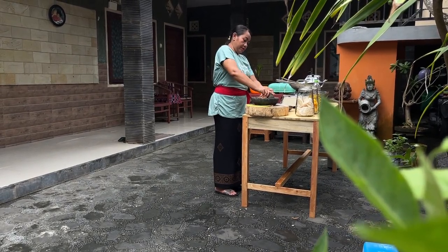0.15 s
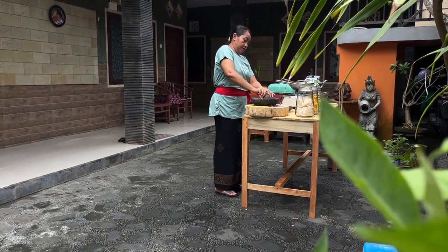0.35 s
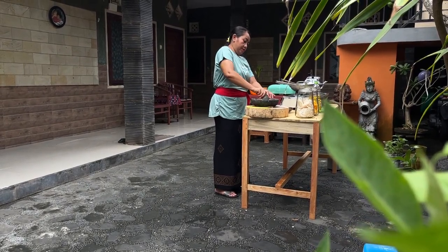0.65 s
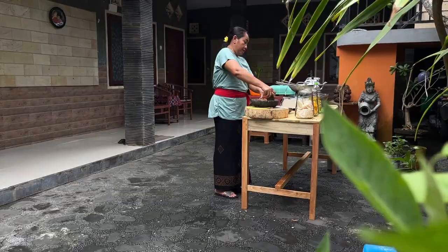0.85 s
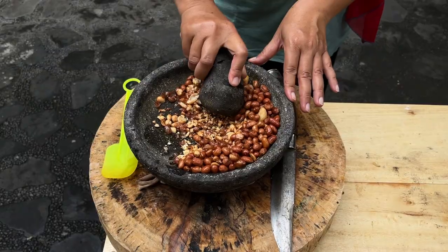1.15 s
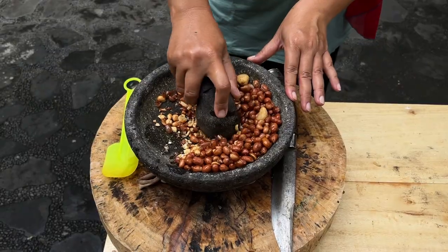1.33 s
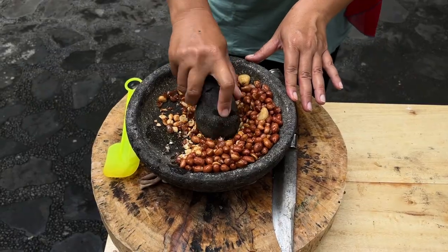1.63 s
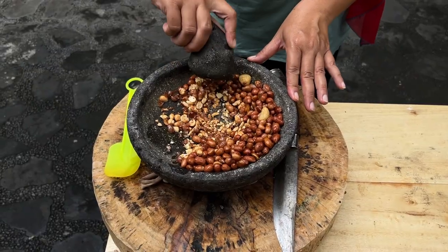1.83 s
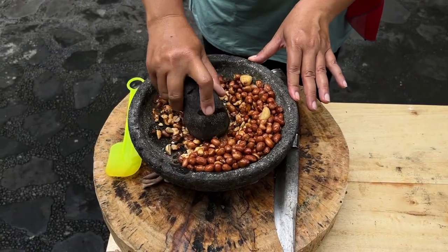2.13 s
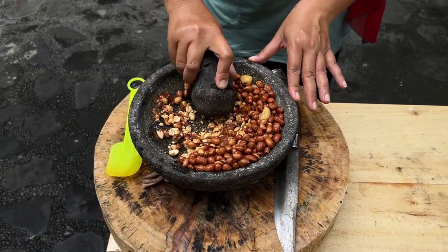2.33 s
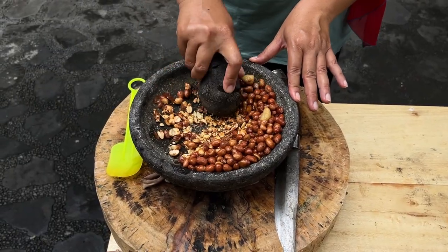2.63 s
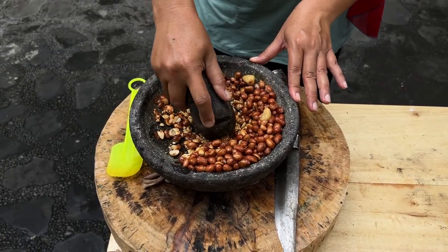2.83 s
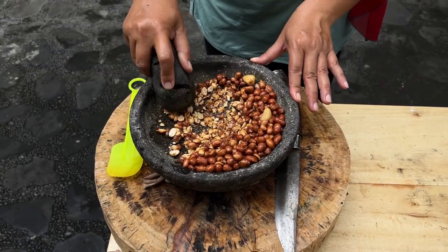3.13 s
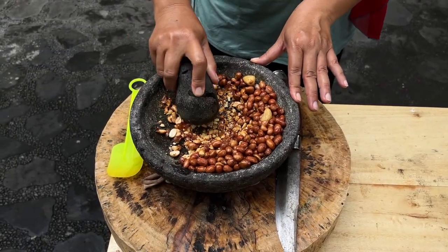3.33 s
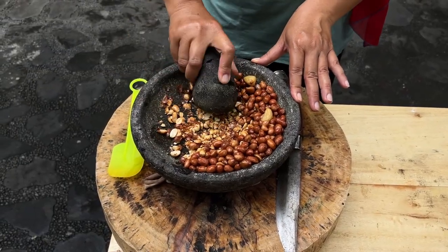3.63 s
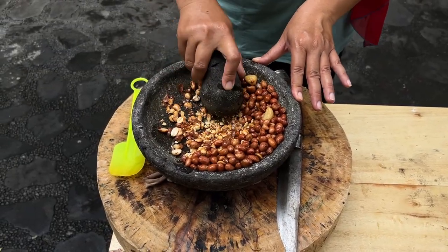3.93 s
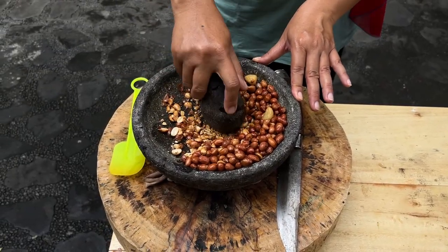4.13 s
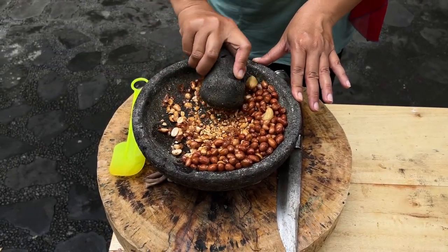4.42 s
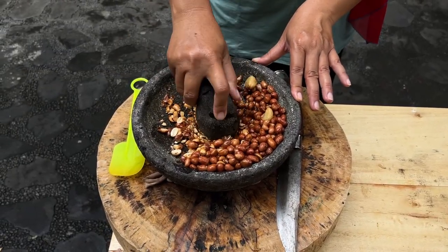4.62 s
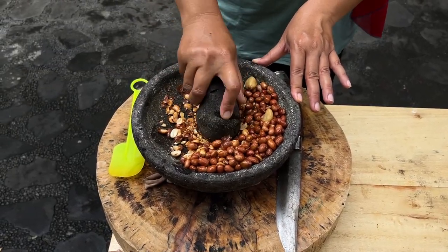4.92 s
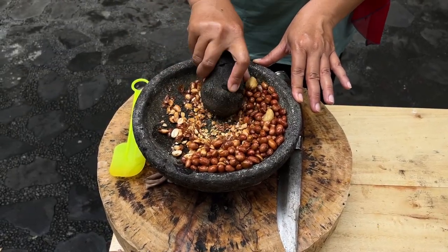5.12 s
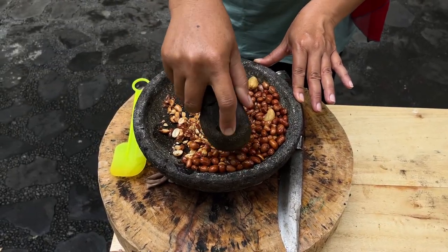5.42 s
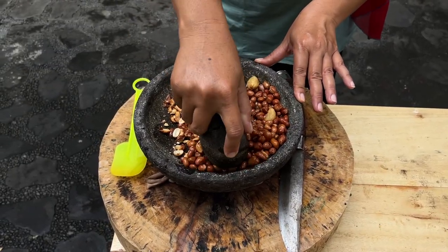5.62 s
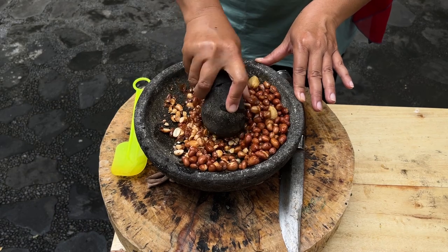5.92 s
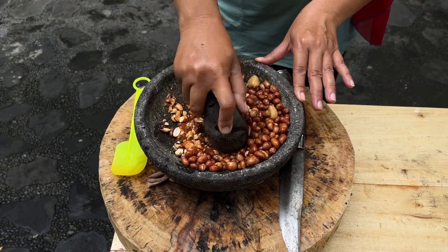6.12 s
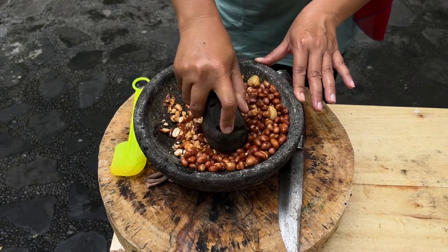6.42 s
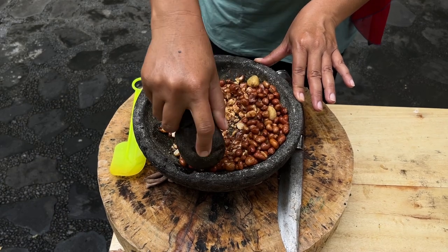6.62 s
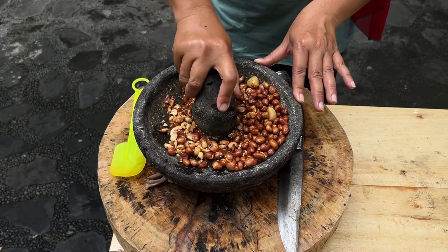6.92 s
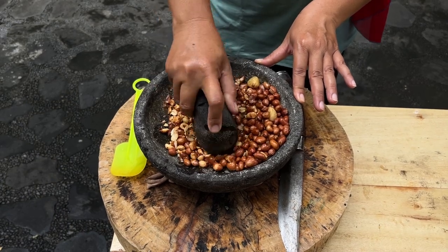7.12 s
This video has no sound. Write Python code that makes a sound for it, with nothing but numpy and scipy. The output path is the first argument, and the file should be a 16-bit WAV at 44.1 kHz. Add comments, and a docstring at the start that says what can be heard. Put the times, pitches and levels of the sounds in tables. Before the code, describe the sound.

Peanuts crushed and ground with a stone pestle in a stone mortar: dry rustling, crisp cracks, low table thumps and three hard stone knocks.

```python
"""Stone mortar in a courtyard

Peanuts are ground with a stone pestle in a stone mortar on a wooden table. For a second the work is faint,
under a small bird's whistles; then, close up, husks rustle as dense noise grains, nuts crack as short bursts,
grit rings the stone modes and jolts drum the table under each stroke. Three times the pestle knocks hard on
bare stone, among weaker touches. Low yard noise lies beneath, and sparse taps echo the work and the bird.
"""
import sys
import numpy as np
from scipy import signal
from scipy.fft import rfft, irfft
from scipy.io import wavfile

SR = 44100
rng = np.random.default_rng(int(sys.argv[2]) if len(sys.argv) > 2 else 0)


def unload_wav(signal):
    """Save mono or channel-first audio to the path in sys.argv[1] as 16-bit WAV at rate SR, clipped to [-1, 1]."""
    wavfile.write(
        sys.argv[1],
        SR,
        np.round(np.clip(np.atleast_2d(signal).T, -1, 1) * 32767).astype(np.int16),
    )


N = 320166
TIME = np.arange(N) / SR
CLOSE_S = 1.02  # the close-up begins (s)
EDGE_HZ = 15600  # top of the recorder's band

# Levels in the tables are relative: most voices add a trim of their own, and spectra are normalised.

# Yard noise far from and beside the table: [pitch_hz, level_db per Hz]
YARD_FAR_SPECTRUM = [(20, -8), (40, -8.5), (70, 4.5), (160, -4.5), (300, -10), (500, -20.5), (1100, -25),
                     (2000, -36.5), (4000, -38), (8500, -46.5), (16000, -47)]
YARD_NEAR_SPECTRUM = [(20, -32), (32, -9.5), (42, -1), (58, 5.5), (85, -5), (150, -8.5), (300, -17.5),
                      (500, -24.5), (1100, -30.5), (2000, -36.5), (4000, -39.5), (8000, -55),
                      (14000, -59.5), (16000, -67)]
# Likeness of the yard noise in the two ports: [pitch_hz, correlation (0 to 1)]
YARD_LIKENESS = [(60, 1), (130, 0.89), (290, .72), (640, 0), (1400, 0), (3100, 0), (6800, 0), (15000, 0.1)]
# A distant motor's hum: [pitch_hz, level_db]
MOTOR_HUM = [(49.5, -58), (101, -57)]
# A bird's falling whistles: [start_s, length_s, start_pitch_hz, end_pitch_hz, level_db]
BIRD_CHIRPS = [(-.025, 0.11, 3530, 2650, -74), (0.242, .125, 3590, 2740, -73)]

# Pushes of the pestle, faint before the close-up, as if from across the yard; lean is the growth in pressure:
# [start_s, length_s, husk_db, grit_db, mash_db, rumble_db, lean_db, husk_coarse_minus_hiss_db]
PESTLE_PUSHES = [(0.06, 0.1, -79.5, -86, -80, -65, 8, 10), (0.358, 0.12, -78.5, -97, -82, -68.5, 8, 9),
                 (0.486, 0.21, -86, -86, -68, -67, -1, 9), (0.728, 0.085, -80.5, -85, -79, -76, 0, 9),
                 (1.013, 0.071, -59.5, -67.5, -85, -53.5, 4, 1),
                 (1.117, 0.15, -54.5, -62, -65.5, -47.5, 11.5, 1),
                 (1.339, .126, -62, -68.5, -72, -51.5, 11, 5), (1.45, 0.16, -60, -63, -67, -52, 9, 1.5),
                 (1.905, 0.25, -54, -62.5, -52.5, -39, -14.5, -2.5),
                 (2.172, 0.15, -64, -71.5, -85, -58, 0.5, 6),
                 (2.323, 0.16, -61.5, -69, -57.5, -44.5, 7.5, -1),
                 (2.551, 0.17, -59, -66.5, -69, -49.5, 14, 0.5),
                 (2.746, 0.08, -62, -58, -57, -39.5, -12.5, -4.5),
                 (3.043, 0.024, -64.5, -51.5, -67, -46, 9, -9), (3.096, 0.13, -51, -66, -58, -44, 8, 0),
                 (3.27, 0.11, -56, -59.5, -65, -41.5, -7.5, -3),
                 (3.469, 0.068, -63.5, -76, -61.5, -49.5, 12.5, 1),
                 (3.593, 0.18, -59.5, -60.5, -60.5, -47.5, -7.5, -5.5),
                 (3.821, 0.088, -67, -69, -70, -55, 12, 0), (3.983, 0.081, -60.5, -59, -69, -44.5, 0.5, -3),
                 (4.089, 0.15, -76.5, -81, -68, -70, 0.5, 19.5),
                 (4.337, 0.21, -53, -59, -62, -42.5, 0.5, 0.5),
                 (4.599, 0.17, -61.5, -72.5, -78, -54.5, 13, 4.5),
                 (4.795, 0.11, -57.5, -60.5, -69, -48, 1.5, -3),
                 (5.006, .11, -64.5, -71.5, -66, -49, -1.5, -2),
                 (5.154, 0.082, -62.5, -66, -70, -48.5, 4, -3), (5.438, 0.14, -68.5, -78, -67, -74, 4, 4),
                 (5.569, 0.076, -47.5, -70, -56.5, -55.5, 4.5, -5),
                 (5.672, 0.13, -52.5, -78, -64, -47, 1.5, 4), (5.825, 0.25, -54, -84, -73, -56.5, 4.5, 8.5),
                 (6.13, 0.19, -56.5, -71, -75, -48.5, -4.5, -1.5),
                 (6.295, 0.16, -58, -61, -59.5, -41.5, -13, 9),
                 (6.676, 0.064, -46.5, -63, -46.5, -48, 2.5, -2.5),
                 (6.778, 0.11, -52, -64, -56, -45, -7, 0), (6.958, 0.1, -51.5, -73, -56.5, -49.5, 3.5, 12),
                 (7.126, 0.23, -55, -67, -83, -49.5, 14, 3)]
# How each sound follows a push:
# [attack_s, release_s, own_rise_db over the push, arch_db from the middle down to either end]
RUSTLE_ENVELOPE = (.018, 0.036, -1, 2.5)
GRIT_ENVELOPE = (.027, 0.013, 3.5, 0.89)
MASH_ENVELOPE = (0.15, 0.0549, -12, 1.5)
RUMBLE_ENVELOPE = (0.049, .048, 5.7, 0.76)
# Colour of the dry husks, of a snapping nut and of the crunching soft mash: [pitch_hz, level_db per Hz]
HUSK_SPECTRUM = [(200, -28), (600, -34), (1500, -9.5), (3000, 2.5), (4200, 0), (5000, 5.5), (6500, 3),
                 (8300, -1), (11000, 7.5), (13500, -0.5), (16000, 1.5)]
SNAP_SPECTRUM = [(300, -9.5), (1000, -17), (2000, -11), (3300, 5.5), (4200, -2.5), (5000, 4), (6500, 2.5),
                 (8500, 4.5), (11000, 1.5), (16000, 0)]
MASH_SPECTRUM = [(150, -10.5), (300, -2.5), (480, 13.5), (750, -4), (1000, 5.5), (1180, 5), (1500, -8.5),
                 (2500, -5), (5000, -24.5)]
# Ringing modes of the two stones: [pitch_hz, level_db, t60_s]
MORTAR_MODES = [(456, -21, 0.054), (554, -14, 0.039), (1161, 2.5, 0.022), (1228, -11, 0.033)]
PESTLE_MODES = [(1926, -21.5, 0.02), (2107, 0, 0.015), (2390, -11.5, .012), (2540, -17, 0.03),
                (3460, -15, 0.029), (4970, -22.5, 0.027), (6060, -24.5, 0.0088)]
# Colour of the drumming wooden table: [pitch_hz, level_db per Hz]
TABLE_SPECTRUM = [(22, -29.5), (35, -24), (50, -4.5), (65, -0.5), (85, -4), (110, -5), (145, 4),
                  (165, -0.5), (187, 3), (208, -9.5), (240, -20), (310, -23), (450, -24), (700, -35),
                  (2000, -67.5)]
# The pestle drops through a crushed nut and jolts the table: [start_s, level_db]
PESTLE_DROPS = [(1.262, -13.5), (1.582, -15.5), (2.016, -2.5), (2.135, -15.5), (2.468, -12), (2.5, -20.5),
                (2.69, -20), (2.782, -11), (3.333, -11.5), (3.386, -14.5), (3.658, -9.5), (4.422, -14),
                (5.785, -16), (6.008, -13), (6.333, -9), (6.408, -15), (6.686, -9.5), (6.885, -17)]
# The loudest nuts breaking: [start_s, snap_db, pestle_ring_db]
NUT_CRACKS = [(1.1524, -28, -36.5), (1.254, -26, -47), (1.3155, -32, -49.5), (1.477, -37.5, -68),
              (1.5615, -30, -41.5), (1.5897, -39, -44.5), (1.6053, -33, -48), (1.9308, -24, -61),
              (2.0006, -26, -50), (2.0074, -24.5, -37), (2.3511, -31.5, -35), (2.4142, -41, -43.5),
              (2.454, -40, -48), (2.4646, -36, -46), (2.6365, -36, -47.5), (2.6628, -31.5, -63),
              (2.6938, -31.5, -50.5), (2.7587, -38, -45), (3.189, -30, -64), (3.527, -34.5, -44.5),
              (3.6499, -39.5, -49.5), (3.9907, -34.5, -61), (4.0102, -41, -47), (4.3655, -24.5, -49),
              (4.3811, -22, -42.5), (4.4136, -26, -46), (4.418, -28, -62), (4.43, -29.5, -61),
              (4.4364, -29, -41), (4.4613, -30, -37), (4.535, -35.5, -47), (4.837, -39, -69),
              (4.972, -50, -65), (5.1567, -37.5, -59), (5.252, -48, -53), (5.5833, -31.5, -56),
              (5.6452, -24, -49), (5.774, -22.5, -45.5), (5.8496, -30, -56), (5.998, -23.5, -49),
              (6.0753, -32.5, -55), (6.0826, -30, -66), (6.2947, -24, -40), (6.322, -22, -52),
              (6.3269, -25, -43), (6.4008, -33.5, -45), (6.4414, -28, -45), (6.714, -27, -63),
              (6.8733, -30.5, -45), (6.8889, -27.5, -51), (7.007, -25.5, -46), (7.0277, -40, -46),
              (7.0504, -28, -47.5)]
# The pestle breaks through the mash and scrapes the bare bowl: [start_s, length_s, level_db]
BOWL_SCRAPES = [(1.468, 0.093, -58), (2.023, 0.093, -53.5), (3.109, 0.036, -47.5), (3.156, 0.042, -52),
                (3.285, 0.067, -58.5), (3.676, .04, -55), (4.45, 0.061, -49.5), (6.338, 0.071, -58),
                (6.401, 0.084, -60), (6.88, 0.082, -57)]
# Colour of stone scraping stone: [pitch_hz, level_db per Hz]
SCRAPE_SPECTRUM = [(150, -17.5), (300, 10), (500, 14), (750, 2.5), (1000, -2.5), (1250, 5), (1600, -8.5),
                   (2500, -13.5), (5000, -18.5)]
# Stone on stone: [start_s, mortar_ring_db, pestle_ring_db, clack_db, clack_pitch_hz, left_minus_right_db]
STONE_KNOCKS = [(1.9169, -11, -54, -11.5, 2070, 0), (3.0679, -16, -30.5, -27, 1190, 1.5),
                (3.0759, -27.5, -48, -29, 1510, 1), (3.12, -30.5, -39, -34, 2730, 5),
                (3.125, -33, -38.5, -32, 2700, -6), (3.135, -34.5, -42, -34, 2700, 4.5),
                (3.186, -36.5, -59, -38.5, 1580, -13), (5.04, -56.5, -50.5, -45.5, 990, -2.5),
                (6.6715, -12, -24, -19.5, 2060, 2), (6.686, -40, -35, -38, 2460, -11)]

# Phase between the two microphone ports: [pitch_hz, left_lead_rad]
PORT_PHASE_LEAD = [(0, 0), (1100, .1), (1700, 0), (2240, .9), (3880, .5), (4820, .6), (6720, -.9),
                   (8350, -3.1), (11800, -6.2), (15800, -9.5)]
# Level between the two microphone ports: [pitch_hz, left_minus_right_db]
PORT_LEVEL = [(100, -2), (200, -2), (500, 0.5), (1130, 5), (1700, -1.5), (2600, 4.5), (3800, 4), (5000, 7),
              (6500, 1), (16000, -1)]
# Decay of the courtyard's tail: [pitch_hz, t60_s]
YARD_DECAY = [(150, 0.43), (500, 0.34), (1200, 0.25), (3000, 0.21), (8000, 0.067), (16000, 0.71)]
# Single echoes from the ground and near walls: [delay_s, level_db]
WALL_ECHOES = [(.0085, -12.5), (.027, -19), (.036, -18.5)]


def gain_of(db):
    """Decibels to amplitude."""
    return 10 ** (np.asarray(db) / 20)


def evened(x):
    """Scales to rms 1."""
    return x / np.sqrt(np.mean(x ** 2) + 1e-20)


def read(points, hz):
    """Reads a curve on a log-frequency axis."""
    f, value = np.transpose(points)
    return np.interp(np.log(hz + 1), np.log(f + 1), value)


def add(mix, s, sound):
    """Mixes a sound in at s seconds."""
    part = mix[max(round(s * SR), 0):][:len(sound)]
    part += sound[:len(part)]


def convolved(x, response):
    """Plays x through an impulse response."""
    return signal.oaconvolve(x, response)[:len(x)]


def colour(points, size=2048):
    """Causal (minimum-phase) impulse response with a given spectrum and energy 1."""
    log_gain = np.log(gain_of(read(points, abs(np.fft.fftfreq(size, 1 / SR)))))
    spectrum = np.exp(np.conj(signal.hilbert(log_gain)))
    response = np.fft.ifft(spectrum).real[:size // 2]
    return response / np.linalg.norm(response)


def ring(modes, detune=1, size=8192):
    """A struck body: a sum of dying sines."""
    t = np.arange(size) / SR
    return sum(gain_of(db - 60 * t / t60) * np.sin(2 * np.pi * hz * detune * t) for hz, db, t60 in modes)


def wander(rate_hz):
    """Smooth random drift of rms 1: noise kept below about rate_hz."""
    hz = np.fft.rfftfreq(N, 1 / SR)
    return evened(irfft(rfft(rng.standard_normal(N)) / (1 + (hz / rate_hz) ** 4), N))


def grains(per_s, spread_db, clump_db, clump_hz):
    """Random tiny impulses of uneven size and sign, whose level swells in clumps."""
    size = gain_of(spread_db * np.minimum(rng.exponential(1, N), 4))
    sign = rng.choice([-1., 1.], N)
    clicks = size * sign * (rng.random(N) < per_s / SR)
    return clicks * gain_of(clump_db * wander(clump_hz))


def background(far_db=-58, near_db=-55.5, swell_db=1):
    """Low outdoor rumble and hiss; beside the table its colour changes and a distant motor hums in it."""
    hz = np.fft.rfftfreq(N, 1 / SR)
    left, other = rfft(rng.standard_normal((2, N)))
    same = np.clip(read(YARD_LIKENESS, hz), -1, 1)
    air = np.array([left, same * left + np.sqrt(1 - same ** 2) * other])
    far = gain_of(far_db) * evened(irfft(air * gain_of(read(YARD_FAR_SPECTRUM, hz)), N))
    near = gain_of(near_db) * evened(irfft(air * gain_of(read(YARD_NEAR_SPECTRUM, hz)), N))
    hum = np.zeros(N)
    for pitch_hz, db in MOTOR_HUM:
        phase = 2 * np.pi * pitch_hz * TIME + .2 * wander(2)
        hum += gain_of(db) * evened(np.sin(phase))
    close = np.clip((TIME - CLOSE_S) / 0.0089, 0, 1)  # a 9 ms crossfade
    return ((1 - close) * far + close * (near + hum)) * gain_of(swell_db * wander(2.3))


def bird(waver_hz=45, waver_rate_hz=130):
    """Slightly wavering sine whistles that slide down."""
    out = np.zeros(N)
    for s, length, start_hz, end_hz, db in BIRD_CHIRPS:
        u = np.clip((TIME - s) / length, 0, 1)
        hz = start_hz + (end_hz - start_hz) * u + waver_hz * wander(waver_rate_hz)
        out += gain_of(db) * np.sin(np.pi * u) * np.sin(2 * np.pi * np.cumsum(hz) / SR)
    return out


def pushes(shape, index):
    """Gain of one sound over all pushes: it builds up, swells or sags with the lean, and dies as the hand lets go."""
    attack_s, release_s, rise_db, arch_db = shape
    power = np.zeros(N)
    for s, length, *levels, lean_db, _ in PESTLE_PUSHES:
        t = np.arange(0, length + 8 * release_s, 1 / SR)
        way = np.minimum(t / length, 1) - .5  # -0.5 at the start of the push, 0.5 at its end
        db = levels[index] + (lean_db + rise_db) * way - arch_db * (2 * way) ** 2
        attack = np.minimum(t / attack_s, 1)
        release = np.exp(-np.maximum(t - length, 0) / release_s)
        add(power, s, (gain_of(db) * attack * release) ** 2)
    return np.sqrt(power)


def husks(level_db=-1, scatter_db=-8, flicker_db=3.0, split_hz=7500):
    """Dry skins and crumbs rub; they lie spread over the bowl, so part of the rustle differs between the ports."""
    layers = []
    for _ in range(3):
        rubs = grains(per_s=9000, spread_db=5.0, clump_db=3.0, clump_hz=86.5)
        layers.append(evened(convolved(rubs, colour(HUSK_SPECTRUM))))
    shared, *own = layers
    fizz = shared + gain_of(scatter_db) * np.array(own)
    coarse = signal.sosfiltfilt(signal.butter(2, split_hz, fs=SR, output="sos"), fizz)
    hiss = fizz - coarse
    # thin skins hiss, coarse crumbs are duller; the balance drifts from push to push and flickers
    s, length, *_, coarse_db = np.transpose(PESTLE_PUSHES)
    balance_db = np.interp(TIME, s + length / 2, coarse_db) + flicker_db * wander(25)
    tilt = gain_of(.5 * balance_db)
    return pushes(RUSTLE_ENVELOPE, index=0) * gain_of(level_db) * (coarse * tilt + hiss / tilt)


def splinters(level_db=-11, tear_s=.0007, size=400):
    """Small pieces snap at random under the moving pestle, each a brief dying burst of noise."""
    tear = np.exp(-np.arange(size) / SR / tear_s)
    snaps = grains(per_s=42, spread_db=2.5, clump_db=-1.2, clump_hz=24)
    bursts = convolved(snaps, tear) * rng.standard_normal(N)
    return gain_of(level_db) * pushes(RUSTLE_ENVELOPE, index=0) * evened(convolved(bursts, colour(SNAP_SPECTRUM)))


def strain(level_db=-14, build_s=.005, ease_s=0.0083):
    """Gain of the grit that a nut sheds: it creaks just before it breaks and crumbles just after."""
    out, t = np.zeros(N), np.arange(-.05, .08, 1 / SR)
    swell = np.exp(np.minimum(t / build_s, -t / ease_s))
    for s, _, pestle_db in NUT_CRACKS:
        add(out, s + t[0], gain_of(pestle_db + level_db) * swell)
    return out


def grinding(pestle_db=0, mash_db=-1, bowl_db=-12, grip=0.072):
    """Grit slips between the stones and rings the pestle; the soft mash crunches and stirs the bowl."""
    grit = grains(per_s=1000, spread_db=3.5, clump_db=3.0, clump_hz=60)
    crush = grains(per_s=1100, spread_db=2.5, clump_db=3, clump_hz=59)
    # the pestle's pitch shifts with where it touches and how hard it is pressed
    touch = np.digitize(wander(20), [-1, 0, 1])
    rings = np.zeros(N)
    for k, shift in enumerate(np.linspace(-grip, grip, 4)):
        rings += convolved(grit * (touch == k), ring(PESTLE_MODES, detune=1 + shift))
    pestle = gain_of(pestle_db) * evened(rings)
    mash = gain_of(mash_db) * evened(convolved(crush, colour(MASH_SPECTRUM)))
    mash += gain_of(bowl_db) * evened(convolved(crush, ring(MORTAR_MODES)))
    grit_gain = np.hypot(pushes(GRIT_ENVELOPE, index=1), strain())
    return grit_gain * pestle + pushes(MASH_ENVELOPE, index=2) * mash


def table(level_db=-2, drop_db=-1):
    """The mortar jolts on its board as the pestle rolls over the nuts or drops through one, and the table drums."""
    jolts = grains(per_s=900, spread_db=-0.5, clump_db=1.64, clump_hz=29.94)
    force = gain_of(level_db) * pushes(RUMBLE_ENVELOPE, index=3) * evened(jolts)
    for s, db in PESTLE_DROPS:
        add(force, s, gain_of([db + drop_db]))  # a single-sample impulse
    return convolved(force, colour(TABLE_SPECTRUM, size=8192))


def cracks(snap_db=-8, ring_db=4, bowl_db=-16, tear_s=0.00054, crumble_s=0.00665, crumble_db=-16,
           lead_s=0.0024, lead_db=-14, shell_db=3, size=1800):
    """A nut creaks, tears in about a millisecond and crumbles; the freed pestle drops on it and rings."""
    out = np.zeros(N)
    t = np.arange(size) / SR - 3 * lead_s  # the break is at t = 0
    creak = gain_of(lead_db) * np.exp(-abs(t) / lead_s)
    crumble = gain_of(crumble_db) * np.exp(-abs(t) / crumble_s)
    crumbs = np.where(t > 0, crumble, creak)
    for s, db, pestle_db in NUT_CRACKS:
        speed, grip, *shell = rng.standard_normal(2 + len(SNAP_SPECTRUM))
        u = np.maximum(t, 0) / (tear_s * np.exp(0.14 * speed))
        burst = (u * np.exp(1 - u) + crumbs) * rng.standard_normal(size)
        # no two nuts sound alike
        snap = colour([(hz, level + shell_db * chance) for (hz, level), chance in zip(SNAP_SPECTRUM, shell)])
        add(out, s + t[0], gain_of(db + snap_db) * convolved(burst, snap))
        stones = ring(PESTLE_MODES, detune=1 + 0.027 * grip) + gain_of(bowl_db) * ring(MORTAR_MODES)
        add(out, s + 0.00098, gain_of(pestle_db + ring_db) * stones)
    return out


def scrapes(level_db=0, ring_db=-9):
    """Rough stone chatters over rough stone in a short swell."""
    swell = np.zeros(N)
    for s, length, db in BOWL_SCRAPES:
        u = np.arange(0, length, 1 / SR) / length
        add(swell, s, gain_of(db) * np.sin(np.pi * u ** 0.74))
    slips = grains(per_s=900, spread_db=0.5, clump_db=4.0, clump_hz=89.5)
    chatter = evened(convolved(slips, colour(SCRAPE_SPECTRUM)))
    bowl = gain_of(ring_db) * evened(convolved(slips, ring(MORTAR_MODES)))
    return gain_of(level_db) * swell * (chatter + bowl)


def knocks(clack_s=0.00039, contact_s=.00004, build_s=0.0019, thud_db=-4, size=8192):
    """The pestle meets bare stone: a short hard clack, the ring of both stones, a thud in the table."""
    out, t = np.zeros((2, N)), np.arange(size) / SR
    contact = t * np.exp(-t / contact_s)  # a film of nut paste dulls the blow
    clack_shape = t / clack_s * np.exp(1 - t / clack_s)
    build = 1 - np.exp(-t / build_s)  # the heavy bowl takes a moment to get going
    for s, mortar_db, pestle_db, clack_db, clack_hz, left_db in STONE_KNOCKS:
        blow = gain_of(clack_db) * clack_shape * np.sin(2 * np.pi * clack_hz * t)
        blow += gain_of(pestle_db) * ring(PESTLE_MODES)
        blow += gain_of(mortar_db) * ring(MORTAR_MODES) * build
        add(blow, 0, gain_of(mortar_db + thud_db) * colour(TABLE_SPECTRUM, size=8192))
        blow = convolved(blow, contact / contact.sum())
        # where the bowl is struck decides which way it radiates
        add(out[0], s, gain_of(left_db / 2) * blow)
        add(out[1], s, gain_of(-left_db / 2) * blow)
    return out


def ports(x):
    """Sound from the bowl reaches the two microphone ports with different delay and level."""
    hz = np.fft.rfftfreq(2 * N, 1 / SR)
    side = np.array([[.5], [-.5]])  # each port takes half of the difference
    level = gain_of(side * read(PORT_LEVEL, hz))
    turn = np.exp(1j * side * read(PORT_PHASE_LEAD, hz))
    return irfft(rfft(x, 2 * N) * level * turn)[:, :N]


def courtyard(x, near_db=-14, near_s=0.0078, walls_db=-20, size=24000):
    """Quick scatter from the table and the cook, a few single echoes, then a thin tail from the walls."""
    taps = rng.choice([-1., 1.], (2, size)) * (rng.random((2, size)) < 3000 / SR)
    t = np.arange(size) / SR
    hz, frame_s, z = signal.stft(taps * (t > .01), SR, nperseg=256)
    fade = gain_of(-60 * frame_s / read(YARD_DECAY, hz)[:, None])
    tail = signal.istft(z * fade, SR, nperseg=256)[1][:, :size]
    scatter = taps * (t > .002) * np.exp(-t / near_s)
    response = (gain_of(near_db) * evened(scatter) + gain_of(walls_db) * evened(tail)) / np.sqrt(size)
    dull = np.hanning(17) / 8  # rough surfaces return little treble
    for delay, db in WALL_ECHOES:
        for channel in response:
            add(channel, delay + .0002 * rng.standard_normal(), gain_of(db) * dull)
    return np.array([convolved(x, r) for r in response])


def scene(bird_echo_db=12, knock_echo_db=1, echo_low_hz=300):
    """The work at the mortar, the bird far off, the yard around both."""
    work = grinding() + scrapes() + table() + cracks() + splinters() + husks()
    blows, song = knocks(), bird()
    loud = work[0] + gain_of(knock_echo_db) * blows.mean(0) + gain_of(bird_echo_db) * song
    # the table's bass stays close; only the higher sound comes back from the yard
    spread = signal.sosfilt(signal.butter(3, echo_low_hz, "high", fs=SR, output="sos"), loud)
    return ports(work + blows) + song + courtyard(spread) + background()


def record(dry):
    """The recorder's band limit: a steep low-pass."""
    low_pass = signal.firwin(511, EDGE_HZ, window=("kaiser", 9), fs=SR)
    return signal.oaconvolve(dry, low_pass[None], "same")


dry = scene()
out = record(dry)
unload_wav(out)
```